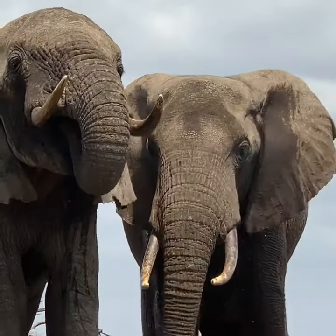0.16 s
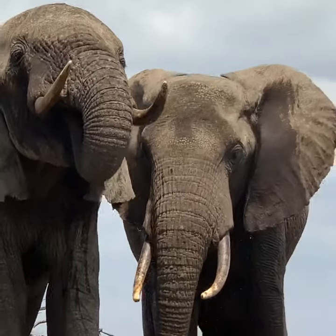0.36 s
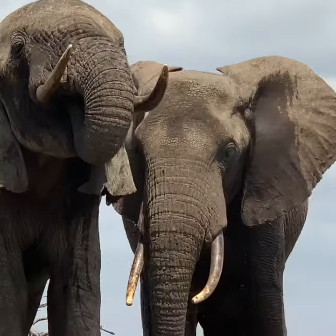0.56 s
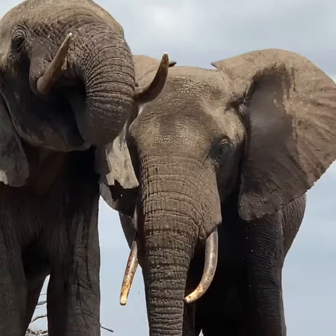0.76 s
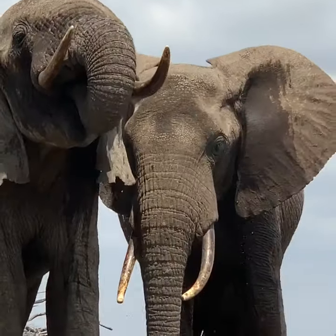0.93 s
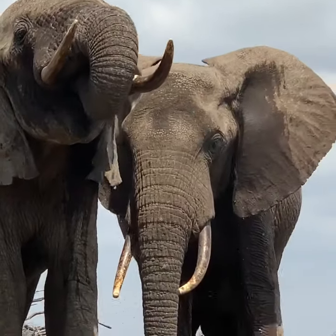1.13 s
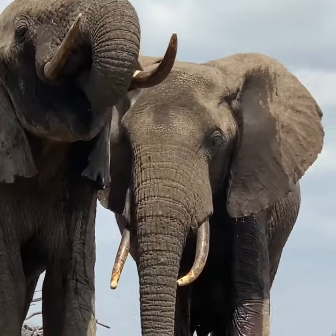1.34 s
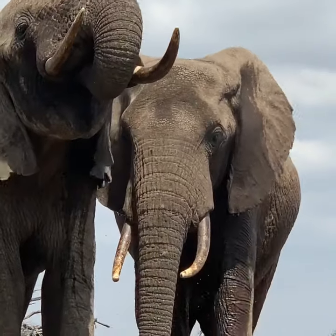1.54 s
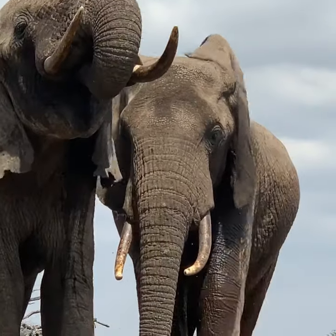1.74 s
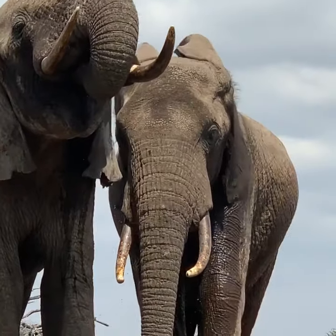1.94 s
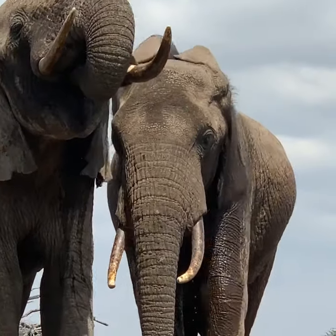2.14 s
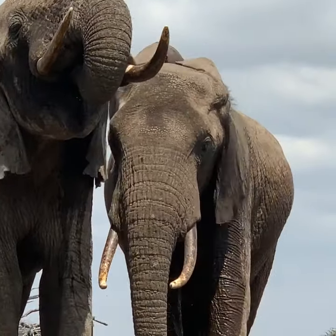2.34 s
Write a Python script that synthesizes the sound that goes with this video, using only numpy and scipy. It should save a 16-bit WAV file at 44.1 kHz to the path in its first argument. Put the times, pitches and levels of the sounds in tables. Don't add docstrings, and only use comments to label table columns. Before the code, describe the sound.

Water splashes and drips at a waterhole as an elephant drinks close by. Quick gushes and plinks crowd the first 0.6 seconds, then thin out over a quiet trickle. Low trunk breath throbs from about 0.4 to 1.2, with soft gulps. Around 1.4 to 1.7 comes the strongest deep fluttering drone, with knocks, spray and a brief wet snort. Soft wind thuds; everything fades by 2.4.

```python
import sys
import numpy as np
from scipy import signal
from scipy.fft import rfft, irfft, next_fast_len
from scipy.io import wavfile
from scipy.ndimage import uniform_filter1d

SR = 44100
rng = np.random.default_rng(int(sys.argv[2]) if len(sys.argv) > 2 else 0)


def generate_wav(signal):
    frames = np.transpose(np.atleast_2d(signal))
    scaled = np.clip(frames, -1, 1) * 32767
    pcm = np.round(scaled).astype(np.int16)
    wavfile.write(sys.argv[1], SR, pcm)


def gain_from_db(level_db):
    decades = np.asarray(level_db, float) / 20
    return 10 ** decades


N = 105840

# f/Hz, width/Hz, gain/dB, change over a full turn/dB
HOUSING_MODES = [(590, 110, -4, -5), (801, 91, 1, 2), (1101, 87, 5.5, -5), (1298, 230, -2, 0),
                 (1610, 120, -4, 1.5), (2013, 290, -1, 1), (2938, 470, -14.5, 3), (3796, 850, -1, -2),
                 (4400, 93, -5.5, 3.5), (5100, 270, -40.5, 25), (6264, 150, -13, 0.5),
                 (6390, 1570, -9.5, 2), (7900, 1100, -11, -10), (10000, 3300, -13.5, 5)]
# t/s, turn (0-1)
ANIMAL_TURN = [(0, 0.1), (.3, 0), (.42, 0.05), (.6, 0.3), (.8, 1), (1.03, 0.3), (1.12, 0), (1.25, 0.1),
               (1.5, 0.1), (1.85, 1), (2.0, .95), (2.4, .9)]
# t/s, level/dB
TRICKLE_LEVEL = [(0, -69), (.05, -61.5), (.45, -59.5), (.85, -60.5), (1.0, -62.5), (1.36, -64),
                 (1.55, -60.5), (1.85, -61.5), (2.25, -66), (2.4, -69)]
# t/s, level/dB
SPRAY_LEVEL = [(0, -70.5), (.1, -74.5), (.7, -74), (1.3, -74.5), (1.8, -71), (2.3, -71), (2.4, -82)]
# t/s, peak/dB, decay t60/s, spray brightness/dB, extra mist/dB
WATER_GUSHES = [(0.022, -62, 0.05, 21, -14), (0.041, -41, 0.16, 3, -4), (0.107, -50, 0.3, 0, -5),
                (0.178, -41, 0.13, -20, -5), (0.219, -49, 0.3, 1, -5), (0.238, -41, 0.09, -6.5, -3),
                (0.256, -41, 0.06, -10, -3), (0.303, -40.5, 0.23, 0, -4), (0.374, -45, 0.11, 3, -8),
                (0.441, -46, 0.1, -11.5, -3), (0.474, -45.5, 0.09, -18, -3), (0.527, -48, 0.052, 3, 3),
                (0.565, -56, 0.07, 3, 14), (0.643, -45, 0.076, 0, 3), (0.77, -46, 0.12, 5, -3),
                (0.845, -53.5, 0.13, -2, -3), (0.885, -53, 0.25, 5, 3), (0.964, -51, 0.08, 14, -9),
                (1.108, -56, 0.086, 20, 3), (1.385, -55, 0.5, 12, -6), (1.405, -47, 0.25, 11, 3),
                (1.477, -54, 0.29, -2, -3), (1.525, -51, 0.4, 4, -5), (1.562, -58, 0.15, 15, 8),
                (1.65, -52, 0.3, 12, 7), (1.725, -52, 0.12, 12, 8), (1.802, -55, 0.12, 14, 4)]
# t/s, level/dB
WIND_LEVEL = [(0, -70.5), (.15, -70), (.3, -68.5), (.57, -59), (.65, -53), (1.1, -62), (1.26, -54),
              (1.34, -61), (1.74, -54.5), (1.95, -63), (2.4, -60)]
# t/s, level/dB
BREATH_EFFORT = [
    (0, -81),
    (.5, -60.5),
    (1.35, -69),
    (1.5, -59),
    (2.4, -67.5),
]
# t/s, level/dB
THROAT_RUSH = [(0, -85), (.27, -69), (.4, -62), (.85, -58.5), (1.35, -65.5), (1.4, -59.5), (1.66, -55.5),
               (1.77, -73.5), (2.0, -80.5), (2.4, -76)]
# t/s, peak/dB, f/Hz, downward slide (1 = full rate), decay t60/s
WATER_DRIPS = [(.044, -50, 555, 0, 0.083), (.181, -54.5, 3750, 1.7, 0.13), (1.713, -45, 1130, 0, 0.05),
               (0.253, -39.5, 1073, 0.07, 0.042), (0.316, -51, 3400, 1.4, 0.08),
               (0.042, -58, 3740, 0.05, 0.063), (.12, -64, 2140, 0.4, 0.06),
               (.197, -49.5, 2150, 0.2, 0.062), (.24, -48, 2000, 0.2, 0.07), (0.3, -43.5, 1455, 0, 0.074),
               (.31, -50.5, 2163, 0.05, 0.065), (0.371, -49, 1010, 0.11, 0.071), (.465, -55, 612, 0.1, .2),
               (.52, -59, 608, 0.11, 0.13), (.575, -59, 655, 0.05, 0.27), (0.481, -60.5, 3410, 0.05, 0.053),
               (0.966, -49, 3990, 0.3, 0.043), (1.404, -46.5, 1540, 0.05, 0.065),
               (1.44, -46, 520, 0.2, 0.054), (1.552, -47.5, 528, 0.05, 0.068), (1.605, -50, 790, 0, 0.071),
               (1.946, -61.5, 1634, .03, 0.18), (2.014, -55.5, 1670, 0.3, 0.1),
               (.527, -45.5, 2000, 0, 0.048), (.873, -37.5, 2220, 1.17, 0.022),
               (.905, -55.5, 757, 0.85, 0.13), (1.413, -51.5, 1135, 0.23, 0.092),
               (1.475, -44, 1073, 0.28, 0.06), (1.533, -50, 795, 0.03, 0.2), (1.58, -57.5, 882, 0, 0.2),
               (1.664, -63, 1120, 0.3, 0.022), (.775, -48, 2190, .1, 0.084),
               (0.774, -55.5, 4560, .1, 0.054), (1.17, -53.5, 2095, 0.1, 0.12)]
# centre t/s, peak/dB, length/s, f/Hz
TRUNK_THROBS = [(0.186, -66, 0.039, 156), (0.274, -54.5, 0.088, 156), (0.322, -58.5, 0.083, 156),
                (0.43, -50, 0.098, 150), (0.488, -53.5, 0.059, 150), (0.547, -79, 0.063, 156),
                (1.023, -58, 0.62, 252.7), (0.648, -46, 0.058, 156), (0.744, -48.5, 0.079, 148.6),
                (0.759, -45, 0.1, 154), (0.839, -47.5, 0.13, 154.7), (0.913, -50.5, 0.12, 149.7),
                (1.023, -46.5, 0.037, 156), (1.062, -51.5, 0.094, 156), (1.115, -53, 0.033, 156),
                (1.194, -48.5, 0.027, 150), (1.23, -55, 0.044, 156), (1.398, -41.5, 0.028, 167.2),
                (1.431, -42, 0.025, 173.7), (1.452, -41.5, 0.082, 152.9), (1.495, -33.5, 0.046, 156),
                (1.525, -37, 0.04, 171.9), (1.568, -37.5, 0.0148, 156), (1.594, -36.5, 0.062, 156.2),
                (1.65, -38, 0.037, 156), (1.707, -49.5, 0.087, 153), (1.754, -44.5, 0.032, 154.1),
                (1.801, -49, 0.1, 156), (1.93, -54.5, 0.22, 153), (2.018, -50, 0.027, 153),
                (2.127, -53.5, 0.066, 150)]
# t/s, peak/dB, f/Hz
THROAT_GULPS = [
    (0.498, -49, 270),
    (0.8, -53, 251),
    (1.388, -48.5, 255.3),
    (1.418, -48, 261),
    (1.57, -49.5, 234),
    (.375, -59.5, 339),
    (0.591, -60.5, 407),
    (1.654, -56, 305),
]
# centre t/s, length/s, low f/Hz, high f/Hz
BAND_DIPS = [
    (.5, .3, 2450, 3150),
    (.9, .13, 3000, 3400),
    (1.12, .17, 2450, 3300),
    (1.9, .3, 3050, 3450),
]
# f/Hz, level/dB
PORT_LEAN = [(60, -0.5), (170, -1.5), (400, -0.5), (3200, -0.1), (3700, 7), (4300, -1.5), (5700, -2.5),
             (7100, -1.4)]
# f/Hz, level/dB
PORT_UNALIKE = [(600, -9.5), (1700, -10.5), (2350, -3), (3050, 4), (4500, -18), (5400, 8), (7900, -18),
                (9500, 9)]

SCATTER_TURN = .55
BETWEEN_DB, WATER_LOW_HZ = -13.5, 594
SCATTER_SWAY_DB, TRICKLE_PATCHY_DB = 3.5, 2.5
TRICKLE_TRIM_DB, GRAINS_PER_S, GRAIN_SPREAD_DB, GRAIN_BED = -1.5, 2500, -10.5, 3.3
SPRAY_FROM_HZ, SPRAY_TRIM_DB, MIST_FROM_HZ, MIST_TRIM_DB = 2840, 4, 6840, -0.5
GUSH_ATTACK_S, GUSH_TRIM_DB = .0035, -8.5
SNORT_S, SNORT_HOLD_S, SNORT_EDGE_S, SNORT_DB, SNORT_BRIGHT_DB = 1.635, .14, .04, -53.5, -4.5
WIND_LOW_HZ, WIND_HIGH_HZ = 26.8, 115
TRUNK_HZ, TRUNK_WIDTH_HZ, BREATH_LUMP_DB, TRUNK_SCATTER_DB = 156, 35.8, 2, -6
THROAT_HZ, THROAT_WIDTH_HZ, THROAT_DB = 276, 59, -4
DRIP_RISE_S, DRIP_SCATTER_DB, SLIDE_OCT_PER_S, DRIP_ROUGH = 0.0057, -6, -20, .8
GULP_T60_S, GULP_TRIM_DB = 0.15, 2
AIRY_S, AIRY_LENGTH_S, AIRY_HZ, AIRY_WIDTH_HZ, AIRY_DB = 2.08, .75, 5200, 450, -75
DROP_SUM_DB, DROP_DIFFERENCE_DB, DROP_FROM_HZ = 5, 10, 1700
FAINT_TOP_HZ, FAINT_DB, CUTOFF_HZ = 8400, -117.5, 8190


def rms_one(x):
    return x / np.sqrt(np.mean(x ** 2) + 1e-20)


def in_time(rows):
    return np.interp(np.arange(N) / SR, *np.transpose(rows))


def at_hz(points, hz):
    f, v = np.transpose(points)
    return np.interp(np.log(hz + 1), np.log(f + 1), v)


def drift(rate):
    r = np.exp(-80 * np.pi * rate / SR)
    noise = rng.standard_normal(N // 40 + 2002)
    slow = signal.lfilter([1], [1, -2 * r, r * r], noise)[2000:]
    return np.interp(np.arange(N) / 40, np.arange(len(slow)), rms_one(slow))


def resonate(x, hz, width_hz):
    r = np.exp(-np.pi * width_hz / SR)
    poles = [1, -2 * r * np.cos(2 * np.pi * hz / SR), r * r]
    return signal.lfilter(np.array([1, 0, -1]) * (1 - r * r) / 2, poles, x)


def cut(x, hz, kind, order=2):
    return signal.sosfilt(signal.butter(order, hz, kind, fs=SR, output="sos"), x)


def twin(patchy_db=0):
    return rng.standard_normal((2, N)) * gain_from_db(patchy_db)


def housing(x):
    x = cut(x, WATER_LOW_HZ, "high", order=4)
    out = gain_from_db(BETWEEN_DB) * cut(x, 2750, "low")
    turn = np.array([in_time(ANIMAL_TURN), np.full(N, SCATTER_TURN)])
    for hz, width, db, turn_db in HOUSING_MODES:
        flicker_db = TRICKLE_PATCHY_DB * drift(8.4)
        sway_db = SCATTER_SWAY_DB * np.outer([-.5, .5], drift(4.9))
        out = out + gain_from_db(db + turn_db * turn + flicker_db + sway_db) * resonate(x, hz, width)
    return out


def water():
    t = np.arange(N) / SR
    body = gain_from_db(in_time(TRICKLE_LEVEL) + TRICKLE_TRIM_DB)
    top = gain_from_db(in_time(SPRAY_LEVEL) + SPRAY_TRIM_DB)
    inside_s = np.minimum(t - SNORT_S, SNORT_S + SNORT_HOLD_S - t)
    snort = np.clip(inside_s / SNORT_EDGE_S + .5, 0, 1) * gain_from_db(SNORT_DB)
    body, top = np.hypot(body, snort), np.hypot(top, snort * gain_from_db(SNORT_BRIGHT_DB))
    mist = top * gain_from_db(MIST_TRIM_DB)
    for s, db, t60, bright_db, mist_db in WATER_GUSHES:
        age = np.maximum(t - s, 0)
        decay = gain_from_db(db + GUSH_TRIM_DB - 60 * age / max(t60, .01))
        gush = decay * (1 - np.exp(-age / GUSH_ATTACK_S))
        body = np.hypot(body, gush)
        top = np.hypot(top, gush * gain_from_db(bright_db - 8.5))
        mist = np.hypot(mist, gush * gain_from_db(bright_db + mist_db - 7.5))
    grain_size = gain_from_db(GRAIN_SPREAD_DB * np.minimum(rng.exponential(1, N), 5))
    grains = (rng.random(N) < GRAINS_PER_S / SR) * grain_size
    spatter = GRAIN_BED + rms_one(uniform_filter1d(grains, size=12))
    wet = housing(twin(0.5 * drift(15)) * spatter)
    low = rms_one(cut(wet, SPRAY_FROM_HZ, "low", order=4))
    high = rms_one(cut(wet, SPRAY_FROM_HZ, "high", order=4))
    fine = cut(cut(high, MIST_FROM_HZ, "high"), MIST_FROM_HZ, "high")
    coarse = cut(cut(high, MIST_FROM_HZ, "low"), MIST_FROM_HZ, "low")
    return body * low + top * coarse + mist * fine


def wind():
    thud = cut(twin(2.0 * drift(9.8)), [WIND_LOW_HZ, WIND_HIGH_HZ], "band")
    return gain_from_db(in_time(WIND_LEVEL)) * rms_one(thud)


def trunk():
    air = twin(BREATH_LUMP_DB * drift(4))
    drone = resonate(resonate(air, TRUNK_HZ, 6.3 * TRUNK_WIDTH_HZ), TRUNK_HZ, TRUNK_WIDTH_HZ)
    rush = resonate(twin(2.0 * drift(20)), THROAT_HZ, THROAT_WIDTH_HZ)
    throat = cut(rush, [210, 650], "band")
    throat_level = gain_from_db(THROAT_DB + in_time(THROAT_RUSH))
    return gain_from_db(in_time(BREATH_EFFORT)) * rms_one(drone) + throat_level * rms_one(throat)


def drips():
    out, t = np.zeros((2, N + SR)), np.arange(SR // 4) / SR
    part_db = np.array([[0], [DRIP_SCATTER_DB]])
    for (s, db, hz, glide, t60), phase in zip(WATER_DRIPS, rng.random((len(WATER_DRIPS), 2))):
        cycles = np.cumsum(hz * 2 ** (SLIDE_OCT_PER_S * glide * t)) / SR + phase[:, None]
        shape = gain_from_db(db + 0.5 - 60 * t / t60 + part_db) * (1 - np.exp(-t / DRIP_RISE_S))
        i = int(s * SR)
        out[:, i:i + len(t)] += shape * np.sin(2 * np.pi * cycles)
    return out[:, :N] * (1 + DRIP_ROUGH * rms_one(cut(twin(), 250, "low")))


def throbs():
    out, t = np.zeros((2, N)), np.arange(N) / SR
    for (s, db, length, hz), phase in zip(TRUNK_THROBS, rng.random((len(TRUNK_THROBS), 2))):
        swell = np.cos(np.pi * np.clip((t - s) / length / 1.13, -.5, .5)) ** 2
        out += gain_from_db(db) * swell * np.sin(2 * np.pi * (hz * t + phase[:, None]))
    return out


def gulps():
    out, t = np.zeros((2, N + SR)), np.arange(SR // 4) / SR
    for s, db, hz in THROAT_GULPS:
        i = int(s * SR)
        shape = gain_from_db(db + GULP_TRIM_DB - 60 * t / GULP_T60_S) * (1 - np.exp(-t / 0.00097))
        out[0, i:i + len(t)] += shape * 1.13 * np.sin(2 * np.pi * hz * t)
    return out[:, :N]


def hump(s, length):
    offset = np.clip((np.arange(N) / SR - s) / length, -.5, .5)
    return np.clip(3 * np.cos(np.pi * offset), 0, 1)


def dipped(x):
    direct, scattered = x
    for s, length, low_hz, high_hz in BAND_DIPS:
        sos = signal.butter(2, [low_hz, high_hz], "band", fs=SR, output="sos")
        direct = direct - hump(s, length) * signal.sosfiltfilt(sos, direct)
    hiss = resonate(rng.standard_normal(N), AIRY_HZ, AIRY_WIDTH_HZ)
    airy = rms_one(resonate(hiss, AIRY_HZ, AIRY_WIDTH_HZ))
    return np.array([direct + gain_from_db(AIRY_DB) * hump(AIRY_S, AIRY_LENGTH_S) * airy, scattered])


def scene():
    size = next_fast_len(N + SR // 4)
    hz = np.arange(size // 2 + 1) * SR / size
    wet = dipped(water())
    low = (wind() + trunk() + throbs() + gulps()) * gain_from_db(np.array([[0], [TRUNK_SCATTER_DB]]))
    direct, scattered = rfft(low + drips() + wet, size, axis=1)
    port = np.array([[.5], [-.5]])
    ports = direct + 2 * port * gain_from_db(at_hz(PORT_UNALIKE, hz)) * scattered
    return irfft(ports * gain_from_db(port * at_hz(PORT_LEAN, hz)), size, axis=1)[:, :N]


def drop_weak(x):
    window = signal.get_window("cosine", 2048)
    hz, _, cells = signal.stft([x[0] + x[1], x[0] - x[1]], SR, window, nperseg=2048)
    cells, hz = cells[:, :1024], hz[:1024, None]
    power = (abs(cells) ** 2).reshape(2, 128, 8, -1).mean(axis=2)
    band_db = 10 * np.log10(power.repeat(8, axis=1) + 1e-30)
    ahead_db = (band_db[0] - band_db[1]) * (hz > DROP_FROM_HZ)
    keep = np.array([ahead_db > -DROP_SUM_DB, ahead_db < DROP_DIFFERENCE_DB])
    keep = keep & ((hz < FAINT_TOP_HZ) | (band_db > FAINT_DB))
    cells = np.pad(cells * keep, ((0, 0), (0, 1), (0, 0)))
    total, difference = signal.istft(cells, SR, window, nperseg=2048)[1][:, :N]
    return np.array([total + difference, total - difference]) / 2


def roll_off(x):
    return signal.sosfilt(signal.butter(12, 9450, fs=SR, output="sos"), x)


def record(dry):
    mix = drop_weak(cut(dry, CUTOFF_HZ, "low", order=6))
    return roll_off(mix)


dry = scene()
out = record(dry)
generate_wav(out)
```